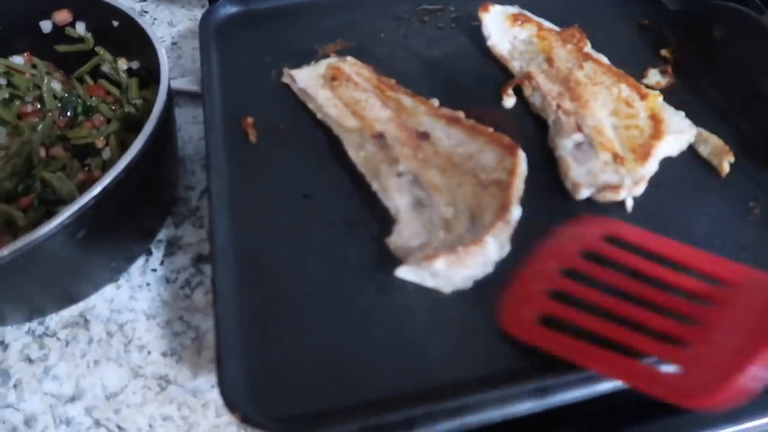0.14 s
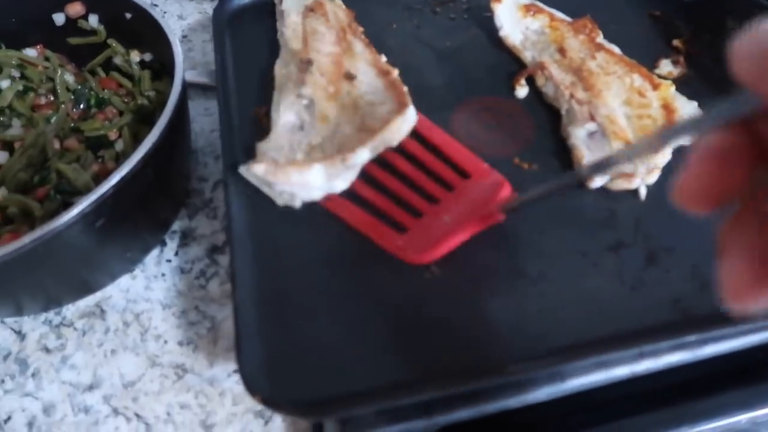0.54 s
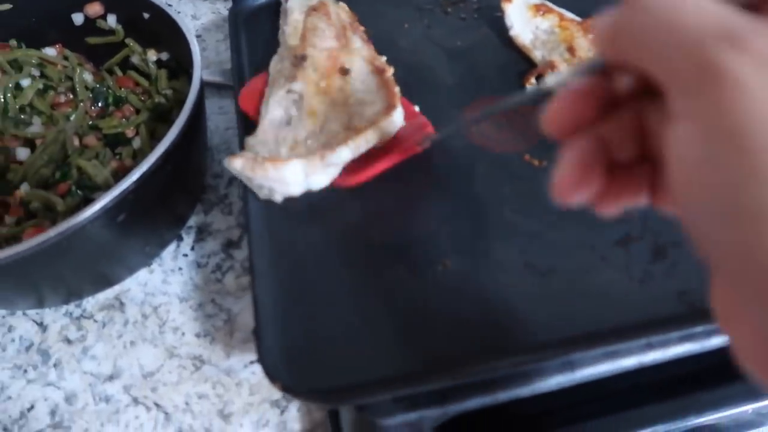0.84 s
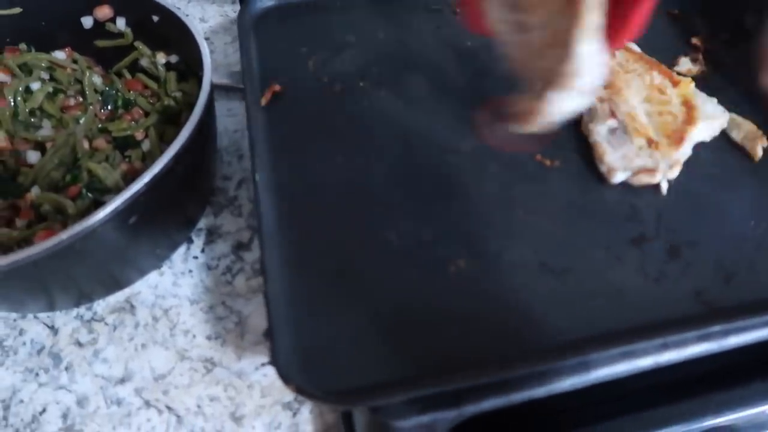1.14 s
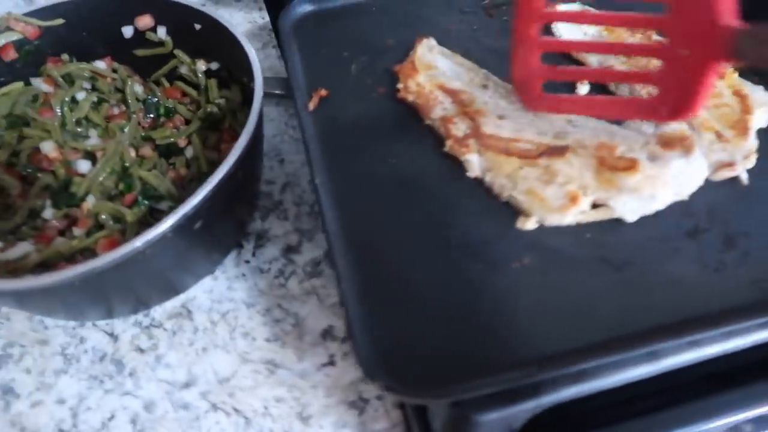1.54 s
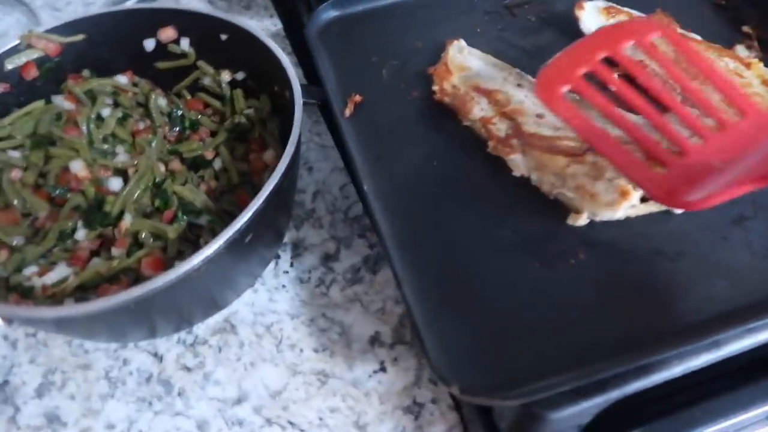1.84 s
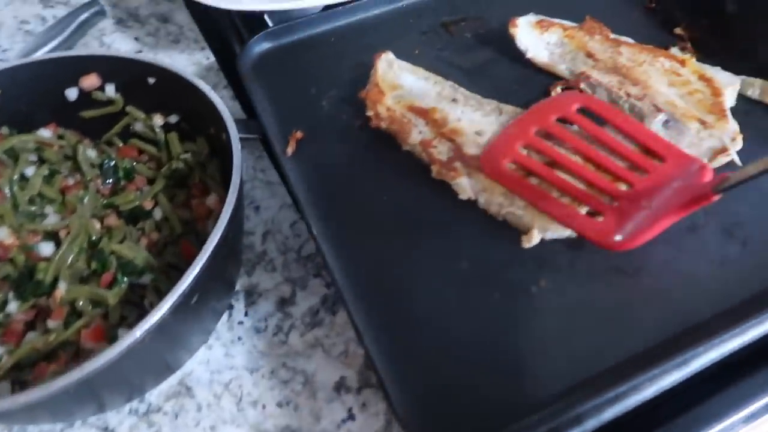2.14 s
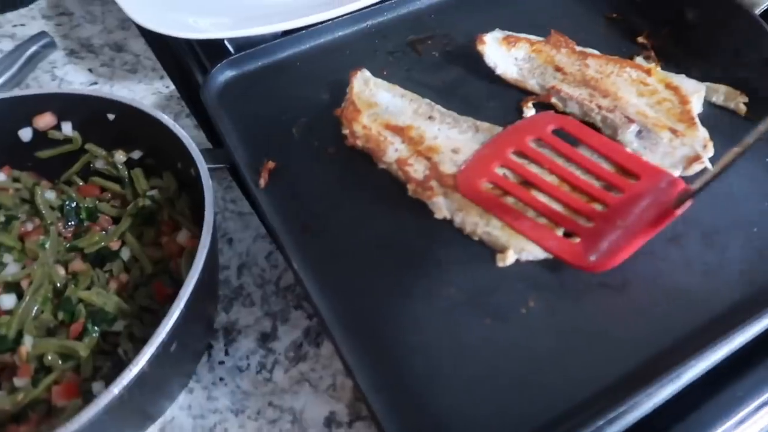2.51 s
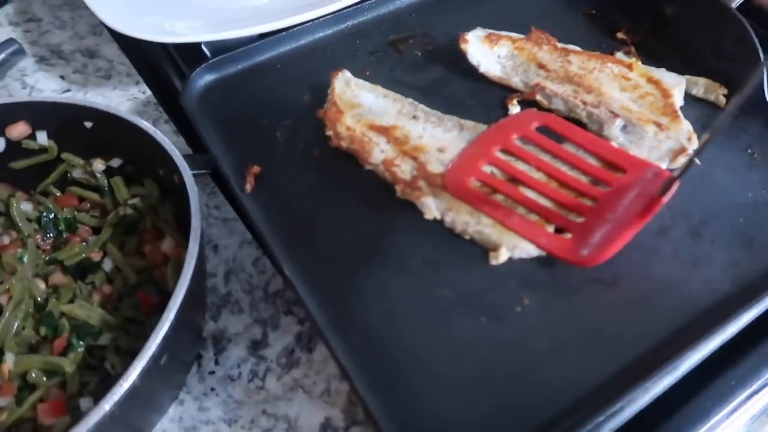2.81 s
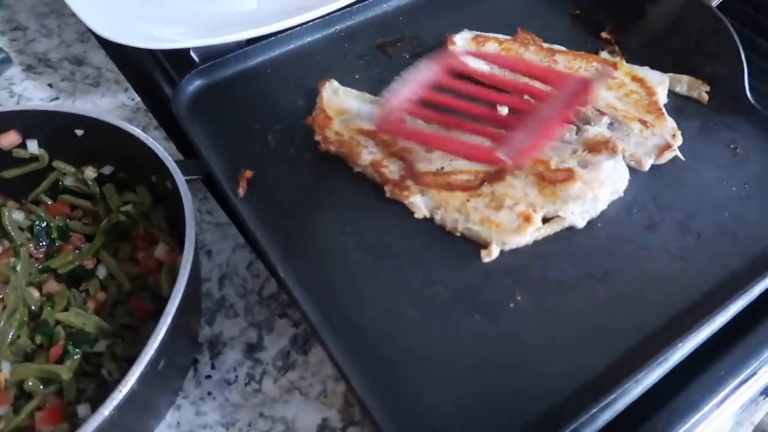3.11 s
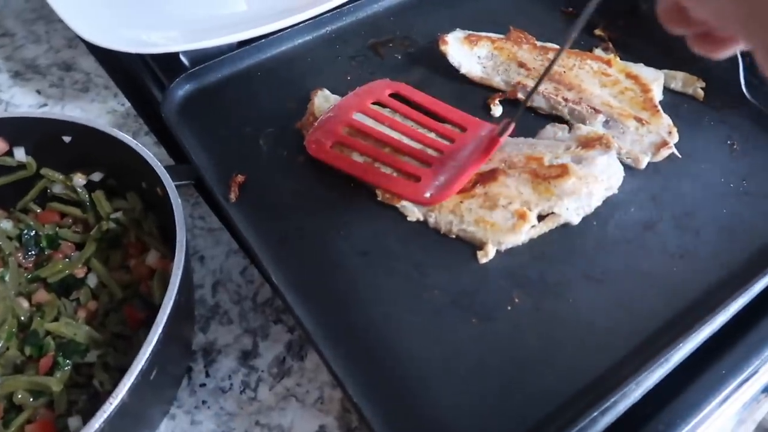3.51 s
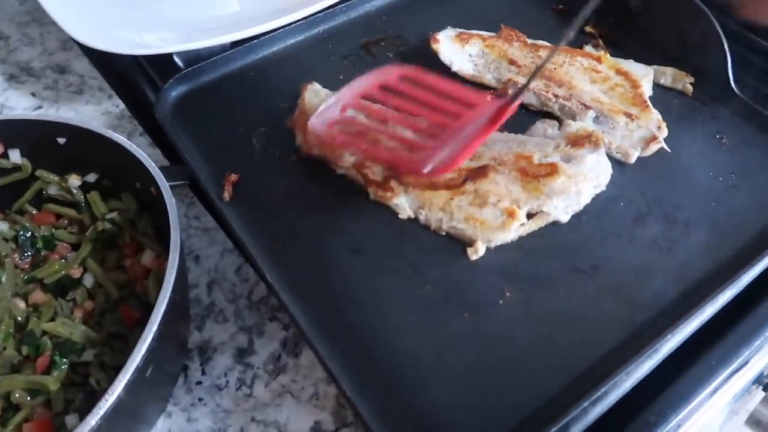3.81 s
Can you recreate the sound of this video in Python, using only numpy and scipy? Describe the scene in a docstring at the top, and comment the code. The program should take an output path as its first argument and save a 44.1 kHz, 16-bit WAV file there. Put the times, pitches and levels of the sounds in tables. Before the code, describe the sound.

Fish sizzles steadily in oil on a griddle; a faint spatula knock, a soft slap as a fillet is flipped, fat spits, then two pressed surges of hiss. Small kitchen, close stereo microphone.

```python
"""A small kitchen: fish fillets fry in oil on a flat griddle, heard from close by through two microphone ports.
Sizzle and the darker roar of juice squeezed out by two presses are random clicks filtered in bands; resonators
ring on them as steam pockets. Fat spits are cracks with dying noise. A spatula knocks the plate and a flipped
fillet slaps down: pushes that ring the griddle's modes. Dense echoes follow; two low hums beat over a rumble."""
import sys
import numpy as np
from scipy import signal
from scipy.fft import rfft, irfft
from scipy.io import wavfile
from scipy.ndimage import uniform_filter1d

SR = 44100
rng = np.random.default_rng(int(sys.argv[2]) if len(sys.argv) > 2 else 0)


def int16_out(signal):
    """Quantize to a 16-bit WAV file."""
    q = np.round(np.clip(np.atleast_2d(signal).T, -1, 1) * 32767)
    wavfile.write(sys.argv[1], SR, q.astype(np.int16))


N = 174195
TIME_S = np.arange(N) / SR
HZ = np.maximum(np.fft.rfftfreq(N, 1 / SR), 1)


def from_db(db):
    """Amplitude gain of a level in dB."""
    return 10 ** (np.asarray(db) / 20)


def rms_one(x):
    """Scale to rms 1."""
    return x / np.sqrt(np.mean(x ** 2) + 1e-20)


def in_time(rows):
    """Interpolate (time_s, value) rows at every sample."""
    return np.interp(TIME_S, *np.transpose(rows))


def at_hz(points, hz):
    """Interpolate (freq_hz, value) rows on a log frequency axis."""
    point_hz, values = np.array(points).T
    return np.interp(np.log(hz), np.log(point_hz), values)


def colour(x, spectrum):
    """Filter x by a (freq_hz, gain_db) curve."""
    return irfft(rfft(x) * from_db(at_hz(spectrum, HZ)), N)


def bandpass(low_hz, high_hz):
    """Second-order Butterworth band."""
    return signal.butter(2, [low_hz, high_hz], "band", fs=SR, output="sos")


def drift(rate_hz):
    """Random flicker of rms 1: noise through two equal poles at rate_hz, less its moving mean."""
    step = 40  # samples per control point
    pole = np.exp(-2 * np.pi * rate_hz * step / SR)
    white = rng.standard_normal(N // step + 2002)
    slow = signal.lfilter([1], [1, -2 * pole, pole * pole], white)
    slow = (slow - uniform_filter1d(slow, size=110))[2000:]  # drop the filter's start
    return np.interp(np.arange(N) / step, np.arange(len(slow)), rms_one(slow))


def ports(spots):
    """Sum three griddle spots at two ports; path differences delay each spot at the left one."""
    # left-port delay of each spot: lag_us
    lags_us = np.array([-8, 30, 42])
    turn = np.exp(-2j * np.pi * HZ * lags_us[:, None] * 1e-6)
    left = irfft((rfft(spots) * turn).sum(0), N)
    return np.array([left, spots.sum(0)])


def bursts(rate_hz, spread_db):
    """Bubble bursts at three spots: random clicks of uneven size and either sign, rms 1."""
    excess = np.minimum(rng.exponential(1, (3, N)), 6)
    sizes = from_db(spread_db * excess) * rng.choice([-1, 1], (3, N))
    return rms_one(sizes * (rng.random((3, N)) < rate_hz / SR))


def sizzle(spectrum, rate_hz, spread_db, sharp, patchy_db, together, shares_db):
    """Bursting bubbles: half-octave bands alternate two click trains, share sharp clicks and flicker."""
    edges_hz = 200 * 2 ** np.arange(0, 6.6, .5)
    trains = [bursts(rate_hz, spread_db) for _ in range(2)]
    wide = bursts(rate_hz / 25, spread_db)
    common = drift(30) + 0.35 * drift(60)
    out = 0
    for k, (low_hz, high_hz) in enumerate(zip(edges_hz, edges_hz[1:])):
        band = signal.sosfilt(bandpass(low_hz, high_hz), trains[k % 2] + sharp * wide)
        out = out + band * from_db(patchy_db * (together * common + drift(29)))
    spots = colour(out, spectrum) * from_db(shares_db)[:, None]
    return rms_one(ports(spots))


def open_frying():
    """Oil bubbles bursting in the open, with vigour that varies in time."""
    # vigour before the 1 dB lift: time_s, level_db
    vigour = [(0.0, -28), (0.4, -29), (1.25, -31.5), (1.5, -30), (1.94, -32.5), (2.17, -28.5),
              (2.36, -28.5), (2.83, -33), (3.0, -29), (3.27, -29.5), (3.52, -32), (3.64, -32),
              (3.68, -27.5), (3.82, -36), (3.95, -33.5)]
    # filter on the bursts: freq_hz, gain_db
    fry_colour = [(250, -26), (500, -12), (737, -21), (839, -6.5), (927, -12), (1200, -7), (2130, -7.5),
                  (2840, -4.5), (5200, -3), (12500, -8), (15500, -25.5)]
    bubbles = sizzle(fry_colour, 6000.0, spread_db=3.0, sharp=0.27, patchy_db=1.52,
                     together=0.39, shares_db=[0, -1, -1])
    return from_db(in_time(vigour) + 1.0) * bubbles


def squeezed_juice():
    """Juice squeezed out under the meat boils off in a darker roar of bursts."""
    # strength of the roar: time_s, level_db
    strength = [(0, -36.5), (.3, -32), (.45, -37), (.58, -27), (.74, -31.5), (.8, -34.5), (1.34, -36.5),
                (1.39, -25), (1.46, -31), (1.68, -29), (1.92, -32.5), (2.12, -33.5), (2.36, -24.5),
                (2.55, -22.5), (2.8, -21.5), (3.03, -24), (3.14, -24), (3.24, -30.5), (3.44, -34),
                (3.462, -24), (3.62, -22), (3.83, -23.5), (3.89, -31.5), (3.95, -30.5)]
    # filter on the bursts: freq_hz, gain_db
    roar_colour = [(180, -49), (300, -14), (477, -15), (629, -18), (884, -8), (1430, -8), (2410, -6),
                   (3600, -5), (4830, -8.5), (6780, -5.5), (12000, -14.5), (15600, -36), (22000, -120)]
    roar = sizzle(roar_colour, 5000.0, spread_db=2.5, sharp=0.48, patchy_db=1.05,
                  together=0.27, shares_db=[0, -3, -3])
    return from_db(in_time(strength)) * roar


def steam_pockets(x):
    """Steam pockets under the meat: narrow resonances add to the sizzle while each one lasts."""
    # resonances, times at mid-fade, gain before flicker: start_s, end_s, freq_hz, width_hz, gain_db
    pocket_rows = [(0.5, 0.82, 3100, 280, -5), (0.5, 1.1, 4300, 180, -7), (-0.5, 1.5, 5360, 170, -4.5),
                   (0, 1.4, 8540, 590, -2.5), (2, 3.05, 1110, 130, -3.5), (2.5, 3.14, 2016, 100, -2.5),
                   (2, 3.19, 2345, 43, 9), (2.66, 3.04, 2520, 80, 3), (2, 3.08, 2810, 150, 0.5),
                   (2.5, 2.48, 3170, 990, -4.5), (3, 2.9, 3300, 59, -2), (2.5, 3.16, 4760, 198, 1),
                   (3, 3.92, 1800, 190, -4), (3.62, 3.87, 2320, 150, -2), (3.46, 4.5, 4900, 100, -6)]
    fade_s, flicker_db, flicker_hz = 0.15, 1.3, 12.0
    out = 0
    for start_s, end_s, hz, width_hz, db in pocket_rows:
        r = np.exp(-np.pi * width_hz / SR)
        peak = (1 - r * r) / 2  # gain near 1 at resonance
        poles = [1, -2 * r * np.cos(2 * np.pi * hz / SR), r * r]
        rung = signal.lfilter([peak, 0, -peak], poles, x)
        lasts = np.clip(np.minimum(TIME_S - start_s, end_s - TIME_S) / fade_s + .5, 0, 1)
        out = out + lasts * from_db(db + flicker_db * drift(flicker_hz)) * rung
    return x + out


def spits():
    """Fat spits: a short broad crack with a dying noise spray, at three spots in turn."""
    # cracks, spray relative to crack: start_s, peak_db, pitch_hz, spray_db
    spit_rows = [(0.5864, -14, 1820, -9), (0.638, -13, 2940, -8), (0.8197, -13, 3500, -8),
                 (1.053, -13, 5170, -9), (1.387, -11.5, 2540, -6), (1.422, -11.5, 4400, -7),
                 (1.596, -15, 3660, -12), (1.699, -9, 3580, -5.5), (1.7288, -15.5, 2230, -5),
                 (1.8444, -5.5, 3650, -9), (1.956, -9.5, 5530, -8), (2.8274, -6, 2340, -14),
                 (2.9113, -5.5, 2400, -6), (3.5292, -8, 4500, -7), (3.8117, -7.5, 3300, -3.5)]
    spray_t60_s, length = 0.049, 4000
    t = np.arange(length) / SR
    out = np.zeros((3, N + length))
    for k, (start_s, db, hz, spray_db) in enumerate(spit_rows):
        band = bandpass(hz / 2.9, min(hz * 2.08, 16000))
        dying = from_db(-60 * t / spray_t60_s) * rng.standard_normal(length)
        crack, spray = signal.sosfilt(band, [t == 0, dying])
        start = int(start_s * SR)
        out[k % 3, start:start + length] += from_db(db) * (crack / crack.max() + from_db(spray_db) * spray)
    return ports(out[:, :N])


def ring(push, hz, t60_s):
    """A griddle mode: a unit click starts a dying sine of initial height 1."""
    r, w = from_db(-60 / (t60_s * SR)), 2 * np.pi * hz / SR
    return signal.lfilter([0, np.sin(w)], [1, -2 * r * np.cos(w), r * r], push + 1e-18)


def knocks():
    """Blows on the griddle: a click and dull shudder, heard directly and through the plate's modes."""
    # pushes, drive before the modes and direct gain: start_s, drive_db, low_hz, high_hz, shudder_t60_s
    knock_rows = [(.304, -27, 200, 900, 0.016), (.314, -31, 350, 500, .09), (.79, -36, 755, 890, .2),
                  (.855, -30.5, 756, 880, 0.18), (1.4675, -22.5, 122, 3200, 0.4),
                  (1.551, -28, 120, 202, .04)]
    # plate modes: freq_hz, gain_db, t60_s
    modes = [(156, -4, 0.13), (270, 1, .035), (317, 1, 0.035), (423, -1, 0.06), (520, -4, 0.04),
             (640, -1, 0.024), (837, 4, 0.03), (888, 2, 0.045), (1158, 2, 0.04), (1540, 0, 0.02),
             (1700, -1, 0.03), (1980, 3.5, 0.026)]
    shudder_db, shudder_top_hz, direct_db, length = -38, 900, 21, 9000
    lowpass = signal.butter(1, shudder_top_hz, fs=SR, output="sos")
    t = np.arange(length) / SR
    push = np.zeros(N + length)
    for start_s, db, low_hz, high_hz, shudder_t60_s in knock_rows:
        dull = rms_one(signal.sosfilt(lowpass, rng.standard_normal(length)))
        force = (t == 0) + dull * from_db(shudder_db - 60 * t / shudder_t60_s)
        start = int(start_s * SR)
        push[start:start + length] += from_db(db) * signal.sosfilt(bandpass(low_hz, high_hz), force)
    push = push[:N]
    out = from_db(direct_db) * push
    for k, (hz, db, t60_s) in enumerate(modes):
        out = out + (-1) ** k * from_db(db) * ring(push, hz, t60_s)
    return out


def kitchen(x):
    """Room reflections: dense dying noise echoes, independent on each side."""
    t60_s, first_echo_s, level_db = 0.2, .004, -8
    echoes = rng.standard_normal((2, N)) * from_db(-60 * TIME_S / t60_s) * (TIME_S > first_echo_s)
    echoes /= np.sqrt(np.sum(echoes ** 2, axis=1, keepdims=True))
    return from_db(level_db) * signal.fftconvolve(x, echoes[:, :SR], axes=1)[:, :N]


def rumble():
    """Room rumble: filtered noise, common and opposed parts, with a wavering level."""
    # filter on the noise: freq_hz, gain_db
    rumble_colour = [(25, -22), (45, -8.5), (86, -6.5), (160, -3.5), (282, 2), (400, -6), (592, -8.5),
                     (712, -36), (850, -8), (1000, -43), (1400, -60)]
    mean_db, side_db, waver_db, waver_hz = -48, 6.5, 2.0, 5.8
    mid, side = (rms_one(colour(rng.standard_normal(N), rumble_colour)) for _ in range(2))
    both = mid + from_db(side_db) * side * [[1], [-1]]
    return from_db(mean_db + waver_db * drift(waver_hz)) * both


def hums():
    """Two steady sines close in pitch beat slowly, alike at both ports."""
    # tones: freq_hz, rms_db, phase_rad
    tones = [(58.24, -63.3, 2.14), (60.08, -60.4, 3.06)]
    return sum(np.sqrt(2) * from_db(db) * np.sin(2 * np.pi * hz * TIME_S + phase)
               for hz, db, phase in tones)


def scene():
    """Sum the griddle sounds, their echoes and the background at the two ports."""
    meat = steam_pockets(open_frying() + squeezed_juice())
    near = (meat + spits() + knocks()) * from_db([[-.2], [.2]])  # left, right
    return near + kitchen(near) + rumble() + hums()


def record(dry):
    """Filter the left-right difference, narrowing the bass, and low-pass the result."""
    # filter on the difference: freq_hz, gain_db
    width = [(100, -73), (300, -23.5), (800, -20), (1500, -30.5), (2400, -13), (3600, 1), (8000, 1),
             (15000, 7.5)]
    stop_hz, stop_db = 16000, 70
    mid = (dry[0] + dry[1]) / 2
    side = colour((dry[0] - dry[1]) / 2, width)
    lowpass = signal.cheby2(12, stop_db, stop_hz, fs=SR, output="sos")
    return signal.sosfilt(lowpass, np.array([mid + side, mid - side]))


dry = scene()
out = record(dry)
int16_out(out)
```